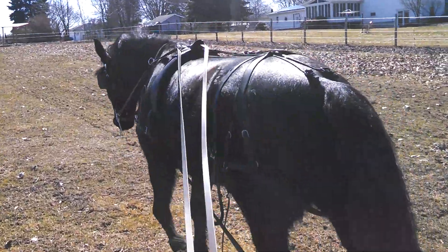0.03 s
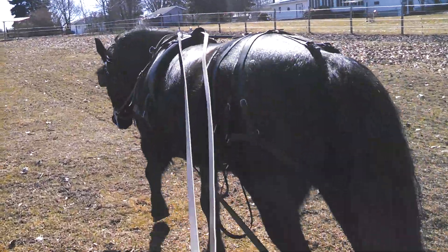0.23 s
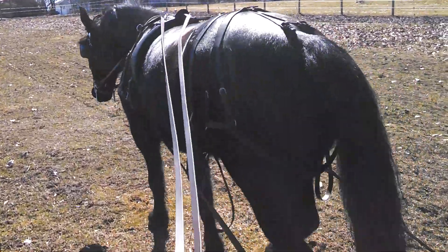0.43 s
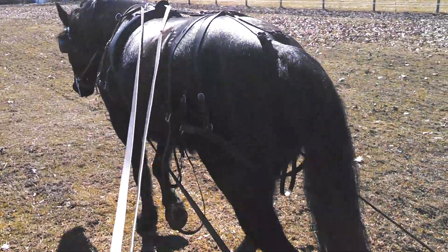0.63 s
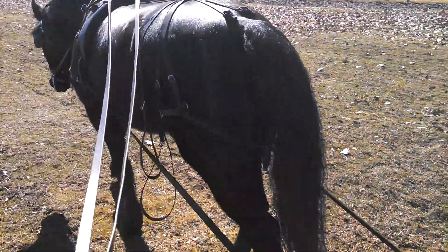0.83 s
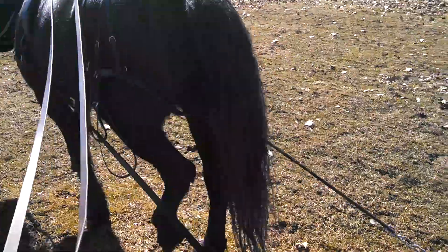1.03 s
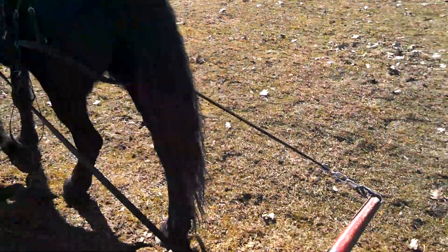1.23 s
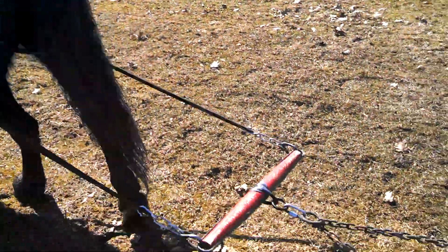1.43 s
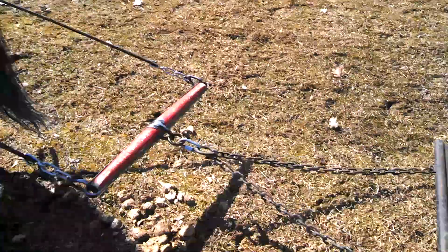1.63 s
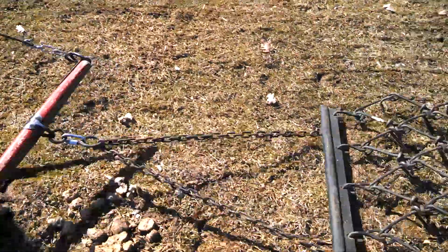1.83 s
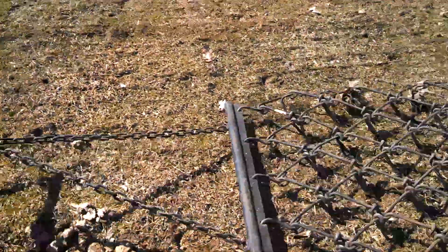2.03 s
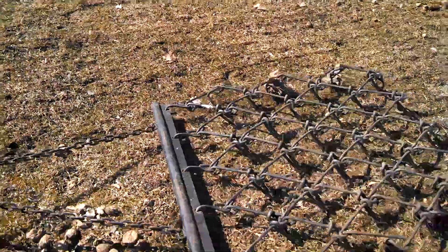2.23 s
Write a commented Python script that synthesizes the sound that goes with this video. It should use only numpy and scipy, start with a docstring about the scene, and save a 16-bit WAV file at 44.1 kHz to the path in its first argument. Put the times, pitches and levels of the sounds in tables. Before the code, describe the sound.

Metal chain mat rattles and scrapes across turf outdoors, with wind puffs buffeting the microphone

```python
"""A steel chain harrow is dragged over dry grass: its links jingle all the time, snatch into short clashes and
squeal once, while the heavy bars clank dully and the tines scrape the turf. Two dull knocks sound, and wind
puffs on the two ports of a microphone. Links and bars are flurries of random contacts that ring fading tones;
scraping and rustling are grainy coloured noise; the squeal is a wavering tone with its octave; the knocks are a
few fading sines; the wind is low noise pushing the ports opposite ways."""
import sys
import numpy as np
from scipy import signal
from scipy.fft import rfft, irfft, next_fast_len
from scipy.io import wavfile
from scipy.ndimage import map_coordinates

SR = 44100
rng = np.random.default_rng(int(sys.argv[2]) if len(sys.argv) > 2 else 0)


def transcribe(u):
    """Save the signal u as a 16-bit wav file named by the first command-line argument.

    u: samples, shape (n,) or (channels, n), limited to [-1, 1]; the rate is SR.
    q: integer samples, one column per channel.
    """
    v = np.clip(np.atleast_2d(u).T, -1, 1)
    q = np.round(v * 32767).astype(np.int16)
    wavfile.write(sys.argv[1], SR, q)


N = 100459  # length in samples

# how hard the harrow drags on the ground [t/s, level/dB]
DRAG_LEVEL = [(0, -34), (.52, -35), (.6, -37.5), (.8, -34), (1.1, -35), (1.44, -35), (1.49, -46),
              (1.56, -41), (2.28, -42)]


def amp(db):
    """Turn decibels into a gain."""
    return 10 ** (np.asarray(db) / 20)


def unit(x):
    """Scale x to an rms (average strength) of 1."""
    return x / np.sqrt(np.mean(x ** 2) + 1e-20)


def along(points, hz):
    """Read a curve of (f/Hz, value) points at the frequencies hz, on a log axis."""
    f, value = np.transpose(points)
    return np.interp(np.log(hz + 1), np.log(f + 1), value)


def curves(rows):
    """Draw each column after the time as a curve with one value per sample."""
    times, *columns = np.transpose(rows)
    return [np.interp(np.arange(N) / SR, times, column) for column in columns]


def wobble(rate):
    """A smooth random curve with rate random points a second."""
    points = rng.standard_normal(int(N * rate / SR) + 4)
    return map_coordinates(points, [np.arange(N) * rate / SR])


def filtered(x, response):
    """Multiply the spectrum of x by a response, given as a function of frequency."""
    n = x.shape[-1]
    m = next_fast_len(n + n // 4)
    return irfft(rfft(x, m) * response(np.fft.rfftfreq(m, 1 / SR)), m)[..., :n]


def coloured(x, spectrum):
    """Shape x by a spectrum of (f/Hz, level/dB) points and scale it to rms 1."""
    return unit(filtered(x, lambda hz: amp(along(spectrum, hz))))


def add(track, s, sound):
    """Mix a sound into the track, starting at s seconds."""
    i = max(0, round(s * SR))
    part = track[..., i:i + sound.shape[-1]]
    part += sound[..., :part.shape[-1]]


def tilt(hz, slope_db):
    """Gain that changes by slope_db per octave from 1.5 to 12 kHz and is 1 at 5 kHz."""
    return amp(slope_db * np.log2(np.clip(hz, 1500, 12000) / 5000))


def scattered(rate):
    """Random moments, rate of them a second, loosely spread over the whole sound."""
    slots = np.arange(int(rate * N / SR))
    return np.clip((slots + rng.uniform(-1, 2, len(slots))) / rate, 0, (N - 1) / SR)


def chance_gain():
    """The random strength of one small contact, within a bounded range."""
    spread_db = 5.5
    return amp(spread_db * rng.uniform(-0.99, 1))


def grit(spectrum, rough_db, rate):
    """Rubbing: noise at both ports whose strength wobbles quickly together, making it grainy."""
    noise = rng.standard_normal((2, N)) * amp(rough_db * wobble(rate))
    return coloured(noise, spectrum)


def rattle(length, modes, scatter, crack_db, colour, first_db, slope_db=0, pitch=1, size=4096):
    """A flurry of contacts rings one piece of steel at both ports, near rms 1 while it lasts."""
    contacts_per_s, contact_spread_db = 1500, 1.5
    swell_s, release_s, crack_s = 0.000916, 0.0033, 0.00604  # build-up, dying away, t60 of the bare crack
    mode_spread_db = 3  # chance in how strongly each tone rings
    t = np.arange(size) / SR
    short = t[:size // 2]

    # one contact: fading tones with a random starting phase at each port, plus a crack of noise
    hz, db, t60 = np.transpose(modes)[:, :, None]
    hz = hz * pitch * (1 + scatter * rng.standard_normal(hz.shape))
    strength = amp(db + mode_spread_db * rng.standard_normal(db.shape))
    fading = strength * np.exp((2j * np.pi * hz - np.log(1000) / t60) * short)
    ring = (np.exp(2j * np.pi * rng.random((2, len(hz)))) @ fading).real
    crack = rng.standard_normal(ring.shape) * np.exp(-np.log(1000) * short / crack_s)
    contact = unit(ring) + amp(crack_db) * unit(crack)

    # when the contacts fall: a first touch at once, then random ones that swell and die away
    touches = rng.random(size) < contacts_per_s / SR
    touches = touches * amp(contact_spread_db * rng.standard_normal(size)) * rng.choice([-1, 1], size)
    touches *= (1 - np.exp(-t / swell_s)) * np.exp(-np.maximum(t - length, 0) / release_s)
    touches[0] = amp(first_db)

    sound = signal.fftconvolve(touches[None], contact, axes=1)[:, :size]
    sound = np.pad(sound, ((0, 0), (32, 0)))  # room for the filter to spread backwards
    sound = filtered(sound, lambda f: amp(along(colour, f)) * tilt(f, slope_db))
    return unit(sound) * np.sqrt((length + release_s) * SR / size)


def wind():
    """Low buffeting that pushes the two ports opposite ways, with short puffs and small eddies."""
    # steady wind [t/s, level/dB]
    steady = [(0, -30), (.46, -28), (.55, -50), (.9, -42), (1.44, -42), (1.52, -52.5), (1.8, -59),
              (1.96, -43), (2.28, -46)]
    # puffs [t/s, length/s, level/dB]
    puffs = [(.022, 0.044, -25), (.205, 0.029, -26), (.272, 0.026, -41.5), (.81, 0.063, -42.5),
             (.982, 0.056, -26.5), (1.23, 0.0286, -28), (1.815, 0.0733, -43.5), (2.205, 0.059, -36.5)]
    # colour of the buffeting [f/Hz, level/dB]
    rumble = [(20, -42), (40, -17), (62, 2.5), (90, 0), (130, -5), (200, -12), (400, -31)]
    rumble_top_hz, eddy_db = 364, -16  # soft upper edge; each port's own eddies

    strength = amp(curves(steady)[0])
    for s, length, db in puffs:
        add(strength, s, amp(db) * np.hanning(int(length * SR)))
    push = np.tanh(coloured(rng.standard_normal(N), rumble)) * np.array([[1], [-1]])
    eddies = amp(eddy_db) * coloured(rng.standard_normal((2, N)), rumble)
    buffeting = filtered(push + eddies, lambda hz: 1 / (1 + (hz / rumble_top_hz) ** 4))
    return strength * unit(buffeting)


def knock():
    """Two dull knocks: a few quickly fading sines with a softly rounded start."""
    # what the knocks ring with [f/Hz, level/dB, t60/s]
    tones = [(250, -1.5, 0.02), (416, -2, 0.0246), (796, 4.5, 0.00545), (1340, -10, .008)]
    # the knocks [t/s, level/dB, brightness/dB per octave]
    blows = [(0.21, -21, -13.5), (0.9085, -19, 1.5)]
    attack_s = 0.0006  # a soft start rounds each blow

    out, t = np.zeros((2, N)), np.arange(SR // 10) / SR
    lowest_hz = tones[0][0]
    for s, level, slope_db in blows:
        thud = np.zeros(len(t))
        for hz, db, t60 in tones:
            gain = amp(level + db + slope_db * np.log2(hz / lowest_hz))
            thud += gain * np.exp(-np.log(1000) * t / t60) * np.sin(2 * np.pi * hz * t)
        add(out, s, thud * (1 - np.exp(-t / attack_s)))
    return out


def squeals():
    """Steel sticks and slips on steel for an instant: a wavering tone and its octave."""
    # the squeals [t/s, length/s, f/Hz, level/dB]
    slips = [(0.79, 0.014, 3257, -13.5)]
    octave_db, waver = -4, 0.007  # octave against the tone; share by which the pitch wavers

    out = np.zeros((2, N))
    for s, length, hz, db in slips:
        n = int(length * SR)
        pitch_hz = hz * (1 + waver * wobble(534)[:n])
        phase = 2 * np.pi * (np.cumsum(pitch_hz) / SR + rng.random((2, 1)))
        swell = np.sin(np.pi * np.arange(n) / n)  # rises and falls once
        add(out, s, amp(db) * swell * (np.sin(phase) + amp(octave_db) * np.sin(2 * phase)))
    return out


def tines():
    """The tines scrape through the frame's resonances and rustle the turf, as the drag rises and falls."""
    # colour of the scrape, with the frame's resonances [f/Hz, level/dB]
    scrape_colour = [(250, -17.5), (700, -13.5), (800, 8.5), (930, 4), (1080, -7), (1230, 7), (1380, -3),
                     (1530, 0.5), (2000, 2), (3000, -2), (6000, -39)]
    # colour of the rustling turf [f/Hz, level/dB]
    turf_colour = [(60, 5.5), (150, -5), (300, 1), (400, -0.5), (455, 5.5), (520, -1), (700, 0),
                   (3000, -24)]
    scrape_db = -4  # against the drag
    turf_db, turf_grows = -45.5, 1.68  # level at average drag; the rustle swings wider than the drag

    drag_db, = curves(DRAG_LEVEL)
    scrape = amp(drag_db + scrape_db) * grit(scrape_colour, rough_db=0, rate=180)
    rustle_db = turf_db + turf_grows * (drag_db - drag_db.mean())
    return scrape + amp(rustle_db) * grit(turf_colour, rough_db=2.0, rate=120)


def bars():
    """Heavy bars knock in single clanks, over a clatter that follows the drag; the grass damps them."""
    # single clanks [t/s, level/dB, f/Hz]
    knocks_of_bars = [(0.195, -30, 1430), (0.366, -26, 1361), (0.415, -29.5, 1552), (0.589, -20.5, 1650),
                      (0.676, -26, 1520), (.693, -34.5, 1532), (.972, -21, 1442), (1.007, -26.5, 1518),
                      (1.099, -21, 1513), (1.151, -30, 1417), (1.219, -28, 1455), (1.257, -23, 1674),
                      (1.364, -22, 1559), (1.586, -28.5, 1475), (1.748, -25.5, 1570), (1.755, -24.5, 1880),
                      (1.914, -28.5, 1475), (2.079, -32.5, 1545)]
    # what a bar rings with [f/Hz, level/dB, t60/s]
    bar_tones = [(823.6, -2, 0.0381), (1245, -1, 0.0867), (1515.7, 4.5, 0.0343), (1710, 2.5, 0.0191),
                 (2069, -11.5, 0.023)]
    # colour of the bars [f/Hz, level/dB]
    bar_colour = [(200, -34.5), (660, -13), (830, -1.5), (1800, 2), (3000, 7.5), (5000, -19.5),
                  (10000, -34.5)]
    bar_hz = 1520  # a clank at this pitch rings the tones unshifted
    clank_s, scatter, crack_db, first_db = 0.00204, 0.0268, 4, 7  # scatter: random share of pitch
    clanks_per_s, clatter_db = 120, -3  # small clanks; their level against the drag

    def clank(pitch=1):
        """One bar struck by a short flurry of contacts."""
        return rattle(clank_s, bar_tones, scatter, crack_db, bar_colour, first_db, pitch=pitch)

    clanks, clatter = np.zeros((2, 2, N))
    for s, db, hz in knocks_of_bars:
        add(clanks, s, amp(db) * clank(hz / bar_hz))
    for s in scattered(clanks_per_s):
        add(clatter, s, chance_gain() * clank())
    return clanks + amp(curves(DRAG_LEVEL)[0] + clatter_db) * unit(clatter)


def links():
    """Links snatch together in loud clashes, over the small jingles and sliding hiss of the whole mat."""
    # clashes [t/s, length/s, level/dB, brightness/dB per octave]
    snatches = [(0.055, 0.005, -18.5, -1.5), (0.211, 0.0147, -28.5, -6), (0.277, 0.043, -26, -3.5),
                (0.406, 0.0062, -23, -2), (0.47, 0.0196, -26.5, -4.5), (0.526, 0.00375, -26, -1),
                (0.544, 0.0028, -20.5, -3.5), (0.549, 0.0073, -21.5, 1.5), (0.674, 0.0404, -28.5, -4),
                (0.762, 0.0333, -24.5, -5.5), (0.796, 0.0106, -28, 3), (0.827, 0.0029, -26, -2),
                (0.926, 0.0056, -25.5, 3), (0.957, 0.004, -21.5, 0), (1.005, 0.0079, -24, -1.5),
                (1.08, 0.003, -21, 4), (1.11, 0.0161, -23.5, 0.5), (1.203, 0.022, -28.5, 6),
                (1.24, 0.026, -28, 9), (1.366, 0.0176, -31, 2), (1.398, 0.00208, -19.5, 2),
                (1.436, 0.0058, -27.5, 4.5), (1.456, 0.00407, -20, 5.5), (1.602, 0.0144, -29.5, 14.5),
                (1.645, 0.012, -27.5, 9.5), (1.709, 0.024, -24.5, 3.5), (1.738, 0.0148, -23.5, -1.5),
                (1.764, 0.0042, -20, 5), (1.819, 0.006, -23, 10), (1.862, 0.0139, -24, 0.5),
                (1.878, 0.0217, -25.5, 4), (1.927, 0.0302, -26.5, -0.5), (1.984, 0.0093, -27, 2),
                (2.113, 0.008, -23, 1), (2.223, 0.0317, -26.5, 3.5), (2.26, 0.0037, -23.5, 6.5)]
    # what a link rings with [f/Hz, level/dB, t60/s]
    link_tones = [(3237.7, -0.5, 0.0331), (3901, -7, 0.0407), (5374, -3, 0.0706), (5675, 7.5, 0.0173),
                  (6131, -4.5, 0.0225), (6816, 2, 0.0271), (7934.5, -1, 0.0634), (8381, 4, 0.036)]
    # colour of the steel [f/Hz, level/dB]
    steel = [(500, -60), (900, -6.5), (1900, -8), (2700, -1.5), (4200, 0), (6000, 4), (7000, 1.5),
             (8400, -3), (9600, -11.5), (13500, -12), (15500, -23.5)]
    # the mat's own jingle [t/s, level/dB, brightness/dB per octave]
    mat_jingle = [(0, -32, -1), (.3, -31, -1.5), (.43, -37, -5.5), (.5, -29, -5.5), (.63, -35, -4),
                  (.8, -33, 0), (1.06, -32, -3.5), (1.23, -28.5, 4), (1.31, -32.5, -6.5), (1.44, -29, 7.5),
                  (1.505, -35, 1.5), (1.6, -30, 3), (1.68, -32, -3), (1.8, -32.5, -3.5), (1.95, -29.5, 5),
                  (2.08, -30.5, 1), (2.28, -29, 1.5)]
    scatter, crack_db = 0.0152, 4.5  # random share of pitch; bare contact over the ring
    clash_first_db, jingle_first_db = 3, 6  # gain of the opening contact
    jingles_per_s, jingle_s = 200, 0.00143
    jingle_db, hiss_db = -0.5, -4.5  # both against the mat's level

    def clash(length, first_db, slope_db):
        """One link rung by a flurry of contacts."""
        return rattle(length, link_tones, scatter, crack_db, steel, first_db, slope_db)

    clashes, mat = np.zeros((2, 2, N))
    for s, length, db, slope_db in snatches:
        add(clashes, s, amp(db) * clash(length, clash_first_db, slope_db))
    level_db, bright_db = curves(mat_jingle)
    for s in scattered(jingles_per_s):
        slope_db = bright_db[int(s * SR)] + rng.normal(0, 0.74)
        add(mat, s, chance_gain() * clash(jingle_s, jingle_first_db, slope_db))
    hiss = grit(steel, rough_db=1, rate=420)
    return clashes + amp(level_db) * (amp(jingle_db) * unit(mat) + amp(hiss_db) * hiss)


def microphone(pair, from_afar):
    """Each port has a delayed copy of the other taken off to widen the image; the result is equalised flat."""
    # likeness of the second port to the first, held within 0-1 [f/Hz, share]
    likeness = [(600, 1.5), (1400, -0.774), (2500, 0.5641), (4000, 0)]
    # level of the second port against the first [f/Hz, level/dB]
    shading = [(500, 3.5), (2000, -4), (4000, -7.5), (7000, -4), (14000, 8)]
    lead_s, cross_delay_s, crossfeed = 0.0001236, 0.000363, 0.975  # second port leads; delay and gain of the copy

    m = next_fast_len(N + SR // 10)
    hz = np.fft.rfftfreq(m, 1 / SR)
    first, own = rfft(pair, m)
    alike = np.clip(along(likeness, hz), 0, 1) * from_afar  # near sounds share nothing
    shade = amp(along(shading, hz))
    # the second port hears part of the first port's sound and part of its own
    shared = shade * alike * np.exp(2j * np.pi * hz * lead_s)
    apart = shade * np.sqrt(1 - alike ** 2)
    cross = crossfeed * np.exp(-2j * np.pi * hz * cross_delay_s)
    from_first = np.array([1 - cross * shared, shared - cross])
    from_own = np.array([-cross * apart, apart])
    power = np.mean(abs(from_first) ** 2 + abs(from_own) ** 2, axis=0)
    return irfft((from_first * first + from_own * own) / np.sqrt(power + 1e-9), m)[:, :N]


def scene():
    """The harrow and the knocks reach both ports alike, and the wind pushes right at the ports."""
    afar = links() + bars() + tines() + squeals() + knock()
    return microphone(afar, True) + microphone(wind(), False)


def record(dry):
    """The two channels differ a little in level with frequency; nothing is kept above the band limit."""
    # right channel over left [f/Hz, level/dB]
    right_over_left = [(200, 2.5), (1500, 0), (2750, -1), (5500, 2), (8200, 1.7), (11000, -0.5)]
    top_hz = 15600
    halves = np.array([[-.5], [.5]])  # left gets half the difference down, right half up
    return filtered(dry, lambda hz: amp(along(right_over_left, hz) * halves) * (hz < top_hz))


dry = scene()
out = record(dry)
transcribe(out)
```